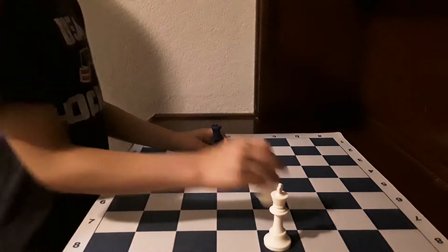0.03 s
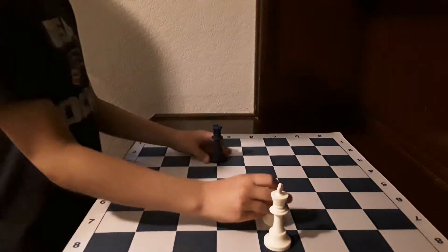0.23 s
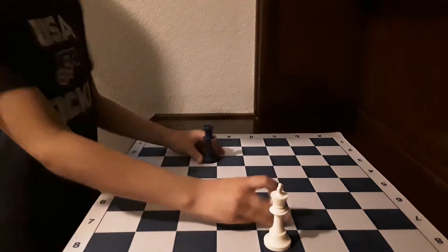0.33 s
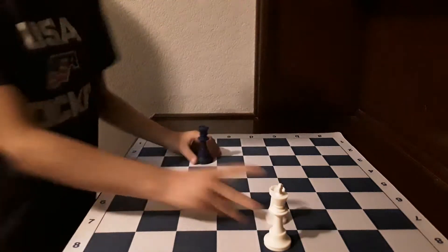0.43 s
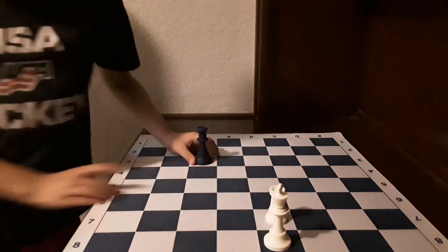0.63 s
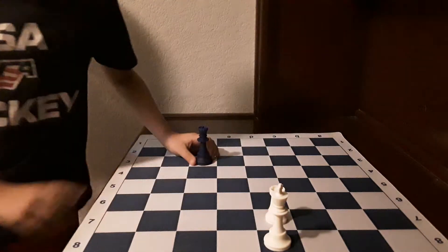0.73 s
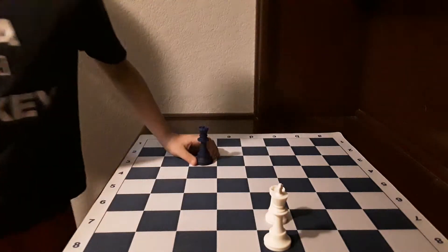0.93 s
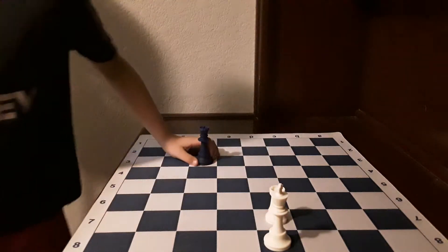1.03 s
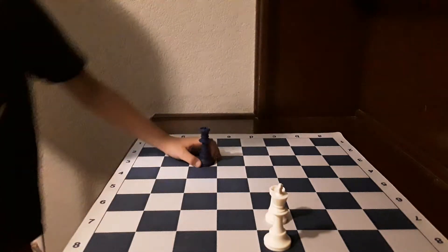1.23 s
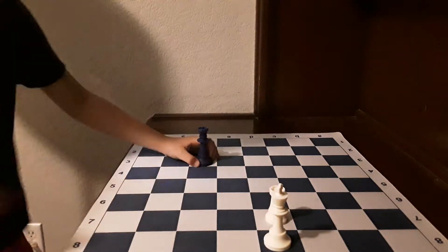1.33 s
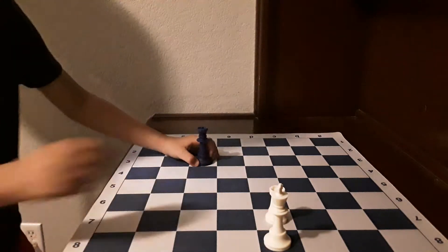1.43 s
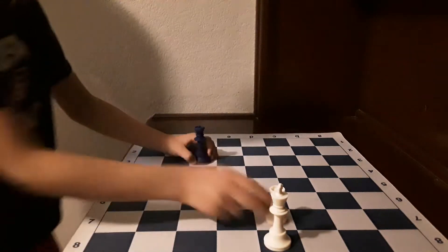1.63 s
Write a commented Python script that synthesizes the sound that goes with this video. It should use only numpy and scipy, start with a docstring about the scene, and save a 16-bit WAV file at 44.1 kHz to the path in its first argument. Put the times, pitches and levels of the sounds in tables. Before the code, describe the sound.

A plastic chess piece knocks down onto a thin board on a table, then sleeves rustle

```python
"""A plastic chess piece is set down on a thin board lying on a table; it rocks and settles with a few taps.
Each tap excites decaying modes of the piece and a noise crack with a diffuse room answer. Blows on the board
ring the table top, which also gives short low hums. Sleeves and skin rustle close by as shaped granular noise,
and a dull thud of damped modes comes from beside the table. A small microphone with a sharp treble peak
hears it in a quiet room, with a faint electronic whine of two sines."""
import sys
import numpy as np
from scipy import signal
from scipy.fft import rfft, irfft, next_fast_len
from scipy.io import wavfile
from scipy.ndimage import map_coordinates

SR = 44100
rng = np.random.default_rng(int(sys.argv[2]) if len(sys.argv) > 2 else 0)


def master_out(mix):
    """Clip the mix to full scale and print it as 16-bit PCM to the path in sys.argv[1]."""
    frames = np.transpose(np.atleast_2d(mix))
    ceiling = np.clip(frames, -1, 1)
    pcm = np.round(ceiling * 32767).astype(np.int16)
    wavfile.write(sys.argv[1], SR, pcm)


N = 74970  # length [samples]


def amp(db):
    """Logarithmic level: the amplitude gain of a level in dB."""
    return 10 ** (np.asarray(db) / 20)


def unit(x):
    """Normalization: a signal scaled to rms 1."""
    return x / np.sqrt(np.mean(x ** 2) + 1e-20)


def curve(rows):
    """Linear interpolation: (time, value) points become one value per sample."""
    times, values = np.transpose(rows)
    return np.interp(np.arange(N) / SR, times, values)


def filtered(x, response):
    """Linear filtering: the spectrum is multiplied by a response of frequency."""
    size = next_fast_len(N + SR // 2)
    spectrum = rfft(x, size) * response(np.fft.rfftfreq(size, 1 / SR))
    return irfft(spectrum, size)[:N]


def coloured(x, points):
    """Spectral shaping: x through (frequency, level) points on a log-frequency axis, at rms 1."""
    f, db = np.transpose(points)
    return unit(filtered(x, lambda hz: amp(np.interp(np.log(hz + 1), np.log(f + 1), db))))


def ring(modes):
    """Modal impulse response: a sum of exponentially decaying sines, each mode with an optional sign."""
    t = np.arange(SR // 2) / SR
    total = np.zeros(len(t))
    for hz, db, t60, *sign in modes:
        total += np.prod(np.sign(sign)) * amp(db - 60 * t / t60) * np.sin(2 * np.pi * hz * t)
    return total


def add(track, s, sound):
    """Superposition: mixes a sound into a track at a time in seconds."""
    part = track[round(s * SR):][:len(sound)]
    part += sound[:len(part)]


def push(contact_s):
    """Contact force: a smooth pulse of area 1; longer contact is duller."""
    pulse = np.hanning(max(round(contact_s * SR), 1) + 2)
    return pulse / pulse.sum()


def burst(envelope, points):
    """Modulated noise: noise under an envelope, then coloured, keeping the envelope's rms."""
    return np.sqrt(np.mean(envelope ** 2)) * coloured(envelope * rng.standard_normal(N), points)


def grains():
    """Granular friction noise: dense random snaps of uneven size over smooth hiss."""
    snaps_per_s, spread_db, snap_share = 900, 1.3, 0.25  # the share is of power
    struck = rng.random(N) < snaps_per_s / SR
    snaps = struck * rng.standard_normal(N) * amp(spread_db * rng.exponential(size=N))
    return np.sqrt(snap_share) * unit(snaps) + np.sqrt(1 - snap_share) * rng.standard_normal(N)


# taps of the hollow piece: (time [s], ring gain [dB], contact [ms], gain of hollow lower modes [dB], crack [dB])
PIECE_TAPS = [(0.156, -40.5, 0.089, -8, -35), (.3262, -50, 0.44, 1, -59), (.3316, -42, 1.2, 4, -63),
              (0.459, -67, 0.091, -7, -52)]
# modes of the piece: (frequency [Hz], level [dB], T60 [s], -1 if it starts inward)
PIECE_MODES = [(580, 1.9, 0.081), (685, -5, 0.11, -1), (1080, 1, 0.072), (1850, 1, 0.021), (3300, 0, 0.01)]
# spectrum of the crack: (frequency [Hz], density [dB per Hz])
CRACK_SPECTRUM = [(500, -9), (900, -1), (1900, -5.5), (3300, -7), (4550, -16), (5900, -7.5), (8300, -1.5),
                  (12000, -39), (15600, -75)]
# spectrum of the room's answer to a crack: (frequency [Hz], density [dB per Hz])
ECHO_SPECTRUM = [(240, -13), (400, -5), (957, -18), (1630, -11.5), (4320, -23.5), (6000, -19.5),
                 (7800, -48)]
HOLLOW_BELOW_HZ = 1400
CRACK_T60_S = 0.032
ECHO_DB, ECHO_RISE_S, ECHO_T60_S = -17.5, 0.006, 0.51  # level re the crack, time constant, decay


def piece():
    """Modal excitation: each tap rings the piece and gives a short crack, which the room answers diffusely."""
    rings, cracks, echoes = np.zeros(N), np.zeros(N), np.zeros(N)
    t = np.arange(SR // 3) / SR
    for s, db, contact_ms, hollow_db, crack_db in PIECE_TAPS:
        modes = [(hz, level + hollow_db * (hz < HOLLOW_BELOW_HZ), t60, *sign)
                 for hz, level, t60, *sign in PIECE_MODES]
        add(rings, s, amp(db) * np.convolve(push(contact_ms / 1000), ring(modes)))
        add(cracks, s, amp(crack_db - 60 * t / CRACK_T60_S))
        echo_rise = 1 - np.exp(-t / ECHO_RISE_S)
        add(echoes, s, amp(crack_db + ECHO_DB - 60 * t / ECHO_T60_S) * echo_rise)
    return rings + burst(cracks, CRACK_SPECTRUM) + burst(echoes, ECHO_SPECTRUM)


# blows on the board: (time [s], gain [dB], contact [ms], gain of lowest mode [dB],
#                      gain of upper modes [dB], T60 factor of the low modes [x])
BOARD_BLOWS = [(.1551, -19, 3.4, 0, 0, 1), (.3385, -33, 2.4, -10, -6, 3.5)]
# modes of the table top: (frequency [Hz], level [dB], T60 [s], sign at the microphone)
TABLE_MODES = [(77.1, -1, .16, -1), (101.6, 6.8, .12, 1), (140.5, 2.2, .126, 1), (144.1, 8.3, .043, -1),
               (175, -6.8, .25, 1), (192.7, -4.1, .2, 1), (219.7, 2.7, .04, -1), (238, -19, .35, 1),
               (279.8, -12.5, .09, -1), (343, -9, .16, -1)]
# short low hums of the table top: (start [s], length [s], peak level [dB], pitch [Hz])
TABLE_HUMS = [(0.044, 0.056, -57.5, 101), (0.2685, 0.032, -34, 107), (.3405, 0.039, -33, 113.4),
              (.385, 0.045, -54, 221.5), (.45, 0.057, -37.5, 101.8), (0.503, 0.023, -38, 91),
              (0.524, 0.051, -42, 79.7), (0.566, 0.042, -47.5, 89), (0.615, 0.092, -49.5, 91),
              (0.713, 0.022, -46.5, 90), (.752, 0.043, -53.5, 117.5), (.752, 0.1, -54, 174.5),
              (.757, 0.083, -64, 350), (1.092, 0.067, -57, 97.4), (1.166, 0.033, -51, 113),
              (1.209, 0.052, -52, 100), (1.269, 0.13, -59.5, 84.3), (1.31, 0.077, -50.5, 94.8)]
# trembling under hands leaning on the table: (time [s], level [dB])
LEANING_LEVEL = [(.16, -69), (.31, -46.5), (.4, -55), (.84, -70.5), (1.08, -76.5), (1.32, -73.5),
                 (1.7, -89)]
LOWEST_BELOW_HZ, UPPER_ABOVE_HZ = 90, 115


def table():
    """Plate resonance: blows ring the table top, short hums swell and fade, leaning hands drive it with noise."""
    out = np.zeros(N)
    for s, db, contact_ms, lowest_db, upper_db, length in BOARD_BLOWS:
        modes = []
        for hz, level, t60, sign in TABLE_MODES:
            # each struck spot has its own modal balance
            level = level + lowest_db * (hz < LOWEST_BELOW_HZ) + upper_db * (hz > UPPER_ABOVE_HZ)
            stretch = length if hz < UPPER_ABOVE_HZ else 1
            modes.append((hz, level, t60 * stretch, sign))
        add(out, s, amp(db) * np.convolve(push(contact_ms / 1000), ring(modes)))
    for s, length, db, hz in TABLE_HUMS:
        t = np.arange(round(length * SR)) / SR
        swell = np.sin(np.pi * t / length)
        add(out, s, amp(db) * swell * np.sin(2 * np.pi * hz * t))
    tremble = unit(signal.fftconvolve(rng.standard_normal(N), ring(TABLE_MODES))[:N])
    return out + amp(curve(LEANING_LEVEL)) * tremble


# cloth close by: (time [s], level [dB])
CLOTH_LEVEL = [(0, -66.5), (.13, -67), (.2, -57.5), (.278, -46), (.39, -46), (.49, -47.5), (.568, -58),
               (.644, -54.5), (.647, -37.5), (.668, -42), (.704, -35.5), (.73, -41), (.81, -51.5),
               (.91, -63.5), (.97, -57.5), (1.078, -62), (1.15, -43), (1.2, -41), (1.264, -56.5),
               (1.36, -54), (1.5, -63), (1.552, -59), (1.7, -67.5)]
# cloth as the microphone colours it: (frequency [Hz], density [dB per Hz])
CLOTH_SPECTRUM = [(700, -30), (1470, -26), (2500, -25), (4960, -19.5), (7510, -1.5), (8430, 4.5), (8970, 2),
                  (11500, -25.5), (15700, -34)]
# single dry snaps of cloth: (time [s], level [dB])
CLOTH_SNAPS = [(0.33, -45), (.838, -44)]
# skin and felt rubbing on the board: (time [s], level [dB])
RUB_LEVEL = [(.15, -77), (.3, -67), (.42, -58), (.5, -63), (.58, -72), (.64, -67.5), (.7, -61),
             (.78, -63.5), (.87, -80.5)]
# rubbing on the board: (frequency [Hz], density [dB per Hz])
RUB_SPECTRUM = [(150, -1), (250, 0.5), (600, -8.5), (1020, -4.5), (1360, -13), (1600, -8), (4000, -14.5),
                (5200, -79)]
# a sleeve sweeping past: (time [s], level [dB])
SLEEVE_LEVEL = [(1.08, -85), (1.13, -73.5), (1.215, -64), (1.27, -73), (1.42, -88.5)]
# the sweeping sleeve: (frequency [Hz], density [dB per Hz])
SLEEVE_SPECTRUM = [(500, -9), (1480, -13.5), (1700, -3), (1950, -10.5), (3750, -19.5), (5200, -36)]
SNAP_T60_S = 0.009
UNEVEN_DB, UNEVEN_PER_S = 1, 40  # scale and rate of random level changes


def rustle():
    """Friction noise: cloth fizzes in the treble with two dry snaps; rubbing and a sweeping sleeve lie lower."""
    # random levels joined smoothly, shared by all three layers
    uneven = UNEVEN_DB * map_coordinates(rng.standard_normal(200), [np.arange(N) * UNEVEN_PER_S / SR])
    cloth_envelope = amp(curve(CLOTH_LEVEL) + uneven)
    t = np.arange(SR // 20) / SR
    for s, db in CLOTH_SNAPS:
        add(cloth_envelope, s, amp(db - 60 * t / SNAP_T60_S))
    sleeve = amp(curve(SLEEVE_LEVEL) + 2 * uneven) * coloured(grains(), SLEEVE_SPECTRUM)
    cloth = cloth_envelope * coloured(grains(), CLOTH_SPECTRUM)
    rub = amp(curve(RUB_LEVEL) + uneven) * coloured(grains(), RUB_SPECTRUM)
    return cloth + rub + sleeve


# low body of the thud: (frequency [Hz], level [dB], T60 [s])
THUD_BODY = [(103, -8.5, 0.25), (133.8, 9, 0.057)]
# the knock that sounds first: (frequency [Hz], level [dB], T60 [s])
THUD_KNOCK = [(419, -3.5, 0.036)]
# room tail of the thud: (frequency [Hz], density [dB per Hz])
THUD_TAIL_SPECTRUM = [(55, -32), (105, 0), (230, -3), (295, -10), (400, -4.5), (720, -21.5), (1060, -42),
                      (2640, -120)]
THUD_S, THUD_DB, BODY_LAG_S = 1.513, -28.5, 0.0065
TAIL_DB, TAIL_T60_S = -41, 0.33


def thud():
    """Damped resonance with gradual onset: a soft knock, its low body just after, and a dull room tail."""
    out = np.zeros(N)
    t = np.arange(SR // 2) / SR

    def rise(time_constant_s):
        """Exponential approach: an onset towards full level."""
        return 1 - np.exp(-t / time_constant_s)

    noise = coloured(rng.standard_normal(N), THUD_TAIL_SPECTRUM)[:len(t)]
    tail = noise * rise(0.014) * amp(-60 * t / TAIL_T60_S)
    knock = amp(THUD_DB) * ring(THUD_KNOCK) * rise(0.0039)
    body = -amp(THUD_DB) * ring(THUD_BODY) * rise(0.0095)
    add(out, THUD_S, knock + amp(TAIL_DB) * tail)
    add(out, THUD_S + BODY_LAG_S, body)
    return out


# steady room tone: (frequency [Hz], density [dB per Hz])
ROOM_SPECTRUM = [(25, -17.5), (66, -4), (586, -22), (952, -26.5), (1550, -28.5), (4930, -46), (8460, -23.5),
                 (9680, -29.5), (11400, -34.5), (14500, -38.5), (15700, -67)]
# the two lines of the whine: (frequency [Hz] of each)
WHINE_LINES_HZ = 9570, 14320
# the two lines of the whine: (level [dB] of each)
WHINE_LINES_DB = (-71, -88)
ROOM_DB = -68.5
WHINE_WAVER = 0.002  # rms pitch drift, as a fraction of the frequency


def room():
    """Stationary noise and frequency modulation: steady room tone and two thin lines that waver together."""
    slow = filtered(rng.standard_normal(N), lambda hz: 1 / (1 + (hz / 8) ** 2))
    drift = 1 + WHINE_WAVER * unit(slow)
    whine = np.zeros(N)
    for hz, db in zip(WHINE_LINES_HZ, WHINE_LINES_DB):
        whine += amp(db) * np.sin(2 * np.pi * hz * np.cumsum(drift) / SR)
    return amp(ROOM_DB) * coloured(rng.standard_normal(N), ROOM_SPECTRUM) + whine


def scene():
    """Linear superposition: all sources summed, mono."""
    return (table() + piece() + thud() + rustle() + room())[None]


BASS_CUT_HZ, TOP_HZ = 53, 15820
OFFSET = -.0006  # of full scale


def record(dry):
    """Band limiting: second-order bass cut, nothing above the top frequency, and a slight constant offset."""
    def response(hz):
        """Magnitude response: high-pass slope times a sharp upper limit."""
        return (hz < TOP_HZ) * hz ** 2 / np.sqrt(hz ** 4 + BASS_CUT_HZ ** 4)

    return filtered(dry[0], response)[None] + OFFSET


dry = scene()
out = record(dry)
master_out(out)
```